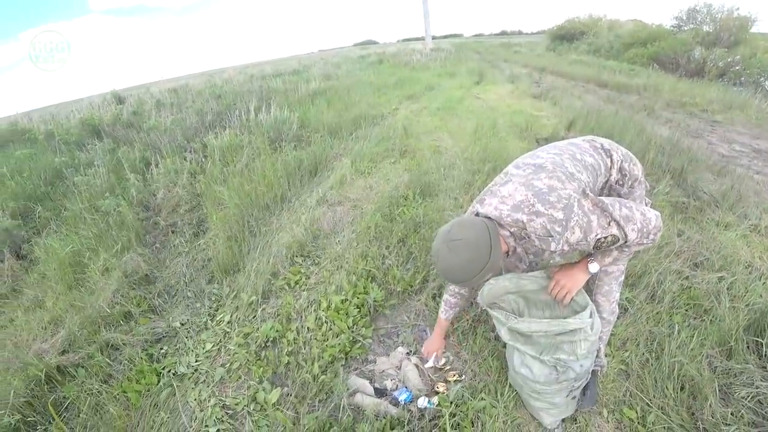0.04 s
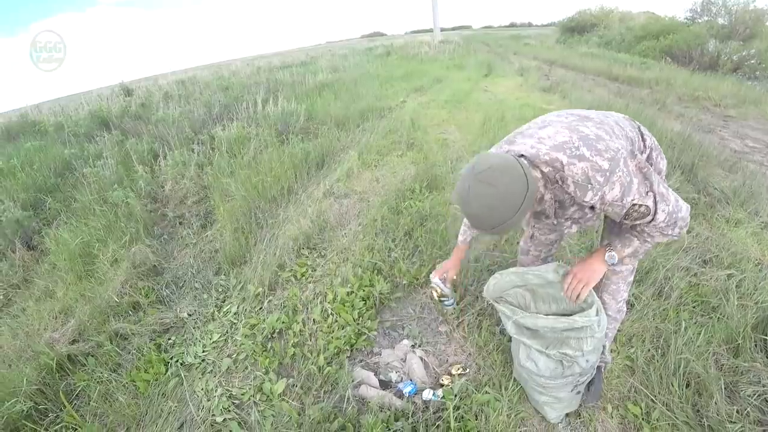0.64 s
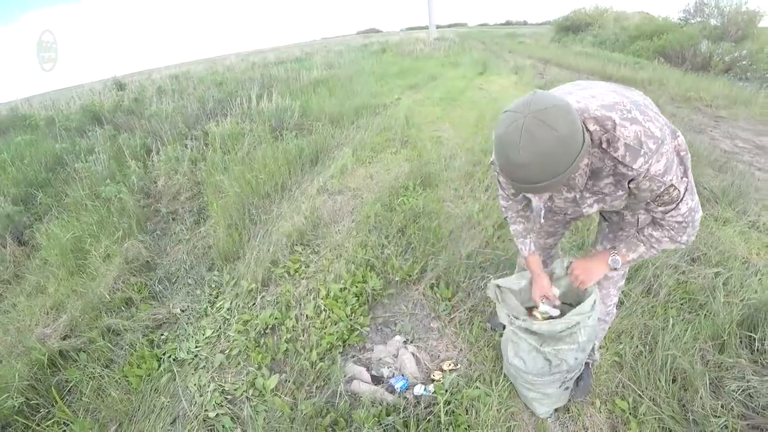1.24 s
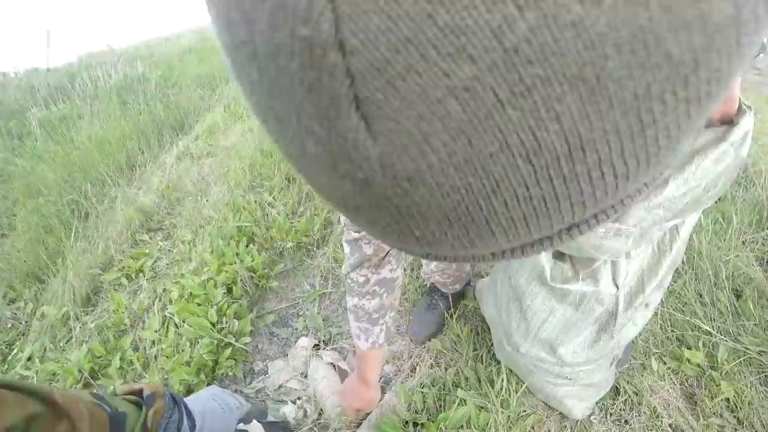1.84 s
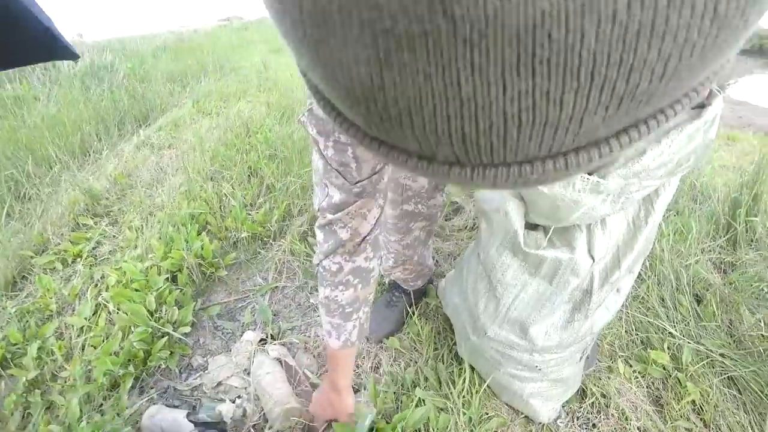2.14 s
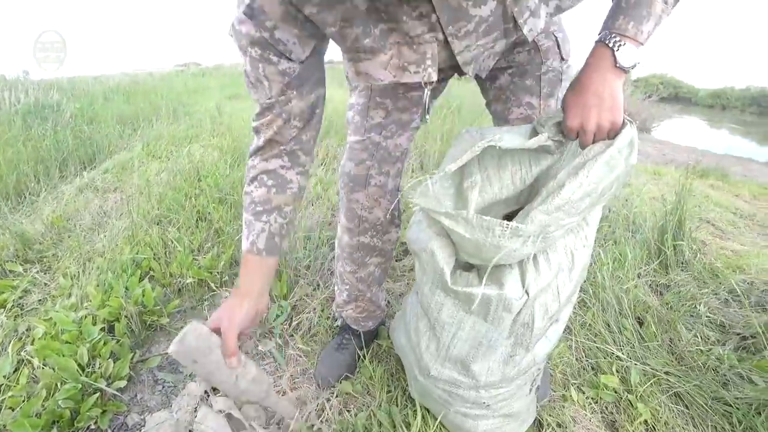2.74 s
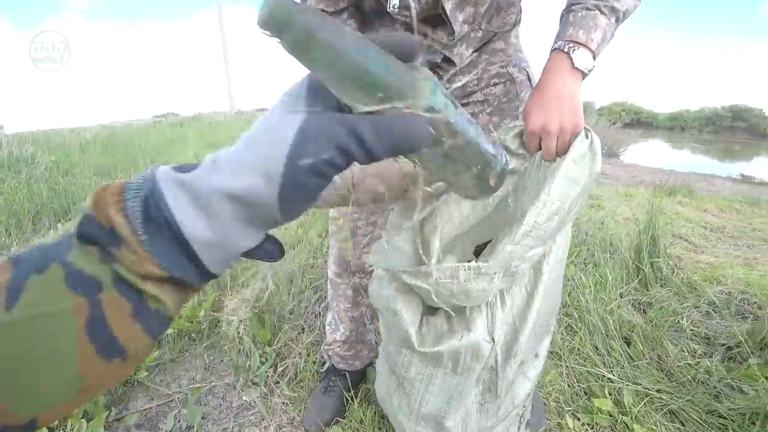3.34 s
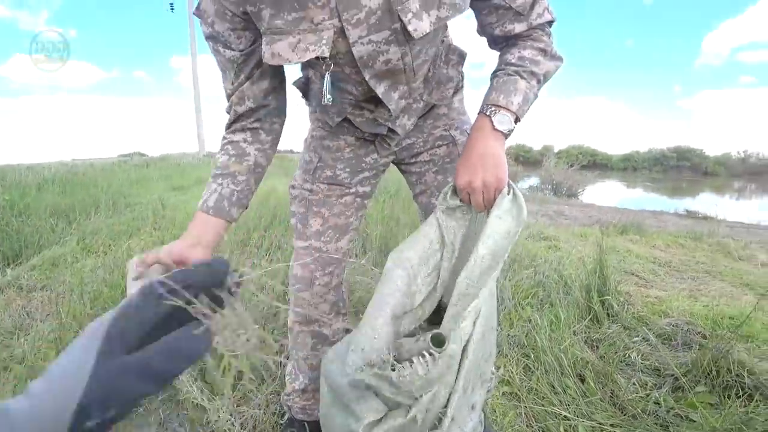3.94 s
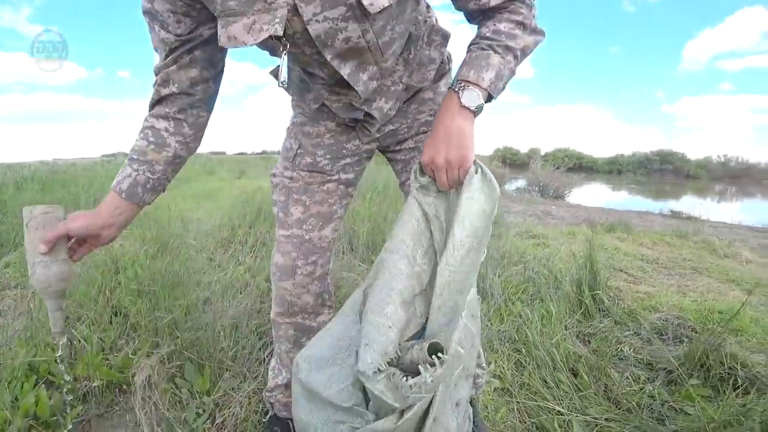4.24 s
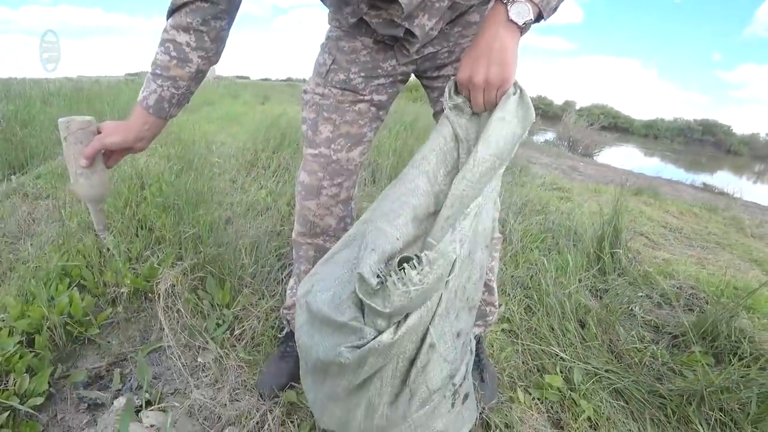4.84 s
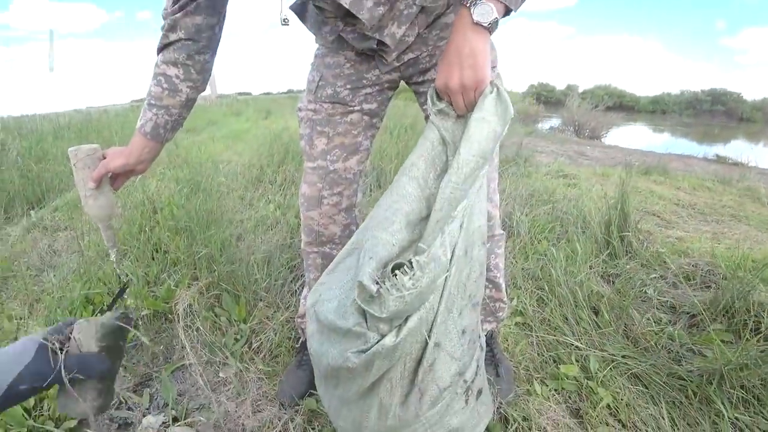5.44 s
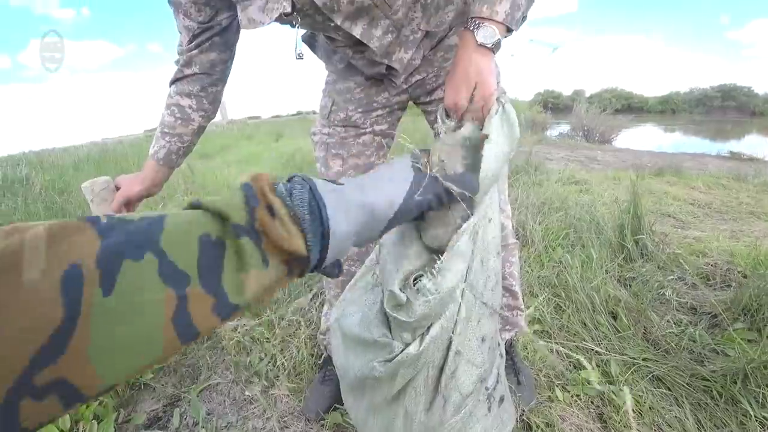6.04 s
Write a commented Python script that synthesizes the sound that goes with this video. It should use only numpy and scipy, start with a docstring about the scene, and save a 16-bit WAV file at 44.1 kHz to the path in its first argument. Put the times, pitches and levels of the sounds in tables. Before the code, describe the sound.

Litter is gathered into a crinkling sack: hollow can knocks, one loud bottle clink, glass chatter and small dry snaps.

```python
"""Cans knock and glass bottles clink into a rustling woven plastic sack on a grassy river bank.
The cans crack and ring briefly; the glass rings in its modes, grinds, and hums softly at the neck.
The sack's walls rub, its tapes tick, its creases pop, and dry stems snap.
Light wind puffs on the microphone, and a limiter squashes the hardest clink."""
import sys
import numpy as np
from scipy import signal
from scipy.fft import rfft, irfft, next_fast_len
from scipy.io import wavfile
from scipy.ndimage import uniform_filter1d

SR = 44100
rng = np.random.default_rng(int(sys.argv[2]) if len(sys.argv) > 2 else 0)


def materialize(psi):
    """Save the field psi as 16-bit PCM at rate SR to the path in sys.argv[1].

    A 1-D psi becomes a single channel; in a 2-D psi each row is a channel.
    """
    bounded = np.clip(np.atleast_2d(psi).T, -1, 1)
    quanta = np.round(bounded * 32767).astype(np.int16)
    wavfile.write(sys.argv[1], SR, quanta)


N = 272979
TIME = np.arange(N) / SR

# the ringing modes of each piece of glass, by name: (pitch [Hz], level [dB], t60 [s])
GLASS_MODES = { "green": [(1331, -2, .14), (1873, -30, .25), (2665, -8, .045), (3068, -18, .06),
               (3395, -2, .1), (3562, 0, .11), (3709, -20, .08), (6977, -30, .1)],
               "brown": [(1131, -3, .07), (2866, 0, .1), (4384, -4, .12), (4464, -5, .1), (5514, -10, .12),
               (5929, -8, .15), (5979, -2, .24), (6127, -7, .16), (7327, -13, .08), (8210, -11, .08),
               (10800, -10, .1), (12600, -10, .07)], "flask": [(2343, 6.5, 0.08), (2980, -24, 0.15),
               (4780, 8.5, .1), (6080, 6.5, 0.19), (6570, 3, 0.069), (7800, -12, .1), (8300, 4, 0.2),
               (10750, 16.5, 0.053)], "heap": [(2945, 0, .12), (4384, -3, .12), (4992, 0, .12),
               (5670, -4, .1), (6000, -2, .12), (7150, -5, .1), (7870, -6, .1), (9220, -7, .08),
               (11100, -3, .1)], "neck": [(4620, -2, .06), (7666, -10, .07), (10087, 0, .07),
               (10260, -11, .07), (10445, -8, .08), (11800, -14, .07)], "muddy": [(2870, -5, 0.075),
               (3360, 5, 0.012)], "shard": [(2600, 0, .045), (4100, -10, .04)],
               "mossy": [(2290, 10.5, 0.051), (3395, 11, 0.14), (5830, 4, 0.012), (11200, 7, 0.033)]}


def from_db(db):
    return 10 ** (np.asarray(db) / 20)


def rms_one(x):
    return x / np.sqrt(np.mean(x ** 2) + 1e-20)


def loudest_one(x, size=176):
    """Scales the loudest 4 ms to rms 1."""
    return x / np.sqrt(uniform_filter1d(np.mean(x ** 2, axis=0), size).max())


def at_hz(curve, hz):
    """Reads a curve along a log frequency axis."""
    curve_hz, values = np.transpose(curve)
    return np.interp(np.log(hz), np.log(curve_hz), values)


def band(x, low_hz, high_hz, order=2):
    sos = signal.butter(order, [low_hz, min(high_hz, .47 * SR)], "band", fs=SR, output="sos")
    return signal.sosfilt(sos, x + 1e-18)


def resonate(x, hz, width_hz):
    return band(x, hz - width_hz / 2, hz + width_hz / 2, order=1)


def radiated(x, low_hz):
    """Small bodies cannot push out bass."""
    return signal.sosfilt(signal.butter(2, low_hz, "high", fs=SR, output="sos"), x + 1e-18)


def add(out, s, sound, pan_db=0):
    """Places a sound in time and between the ears; positive pan is left."""
    start = round(s * SR)
    panned = sound * from_db([[pan_db / 2], [-pan_db / 2]])
    out[:, start:start + sound.shape[-1]] += panned[:, :N - start]


def colour(noise, spectrum, likeness=None):
    """Gives two rows of noise a spectrum and mixes them as mid and side; rms 1."""
    # the default stereo image: (frequency [Hz], left-right likeness [0-1])
    usual_likeness = [(60, 0.23), (250, 0.72), (1000, 0.15), (4000, 0.84), (9000, 0.88), (15000, 1)]
    size = next_fast_len(N)
    hz = np.maximum(np.fft.rfftfreq(size, 1 / SR), 1)
    mid, side = rfft(noise, size) * from_db(at_hz(spectrum, hz))
    alike = np.clip(at_hz(likeness or usual_likeness, hz), 0, 1)
    stereo = np.sqrt(1 + alike) * mid + np.sqrt(1 - alike) * side * [[1], [-1]]
    return rms_one(irfft(stereo, size)[:, :N])


def drift(per_s):
    """A random wander between knots of spread 1."""
    knots = rng.standard_normal(N // 20)
    return np.interp(TIME * per_s, np.arange(len(knots)), knots)


def grainy(per_s, size_db, grain_s, smooth):
    """Two rows of noise made of tiny bursts of uneven size over a smooth share."""
    sizes = (rng.random(N) < per_s / SR) * from_db(size_db * np.minimum(rng.exponential(1, N), 4))
    power = signal.lfilter([1], [1, -np.exp(-1 / (grain_s * SR))], sizes ** 2 + 1e-18)
    return np.sqrt(power / power.mean() + smooth) * rng.standard_normal((2, N))


def fading(t60, rise_s=0.00011, size=8000):
    """A burst of noise that swells at once and dies, nearly alike in both channels."""
    t = TIME[:size]
    mid, side = rng.standard_normal((2, size))
    return (mid + 0.26 * side * [[1], [-1]]) * from_db(-60 * t / t60) * (1 - np.exp(-t / rise_s))


def crack(hz, t60, tail_db=-26, tail_t60=0.067):
    """A short broad crack around one pitch; peak 1."""
    burst = fading(t60, rise_s=0.00008) + from_db(tail_db) * fading(tail_t60)
    sound = band(band(burst, hz * 0.53, hz * 1.35, order=1), 340, hz * 2.4)
    return sound / np.abs(sound).max()


def pings(per_s, low_hz, high_hz, width_hz, count=14):
    """Many small touches, each ringing one of many unrelated pieces; rms 1."""
    touches = (rng.random(N) < per_s / SR) * rng.standard_normal(N)
    piece = rng.integers(0, count, N)
    pitches = np.geomspace(low_hz, high_hz, count) * (1 + rng.uniform(-0.86, 1, count) / count)
    return rms_one(sum(resonate(touches * (piece == k), hz, width_hz) for k, hz in enumerate(pitches)))


def wind(air_db=-72, puff_half_s=0.019):
    """Short low puffs on the microphone over the faint hush of open grassland."""
    # puffs of wind and soft bumps: (time of the crest [s], level [dB])
    puffs = [(0.501, -45), (0.565, -52.5), (0.629, -52.5), (0.812, -55), (0.96, -54.5), (1.385, -57),
             (2.584, -44.5), (2.666, -48), (4.24, -46), (4.283, -35.5), (5.04, -49), (6.026, -51.5)]
    # the tone of the open air: (frequency [Hz], relative level [dB])
    air_spectrum = [(30, 6), (100, 15.5), (250, 10.5), (600, 13), (1500, 4.5), (4000, -6.5), (9000, -54),
                    (16000, -19)]
    gusts = sum(from_db(db) * np.exp(-((TIME - s) / puff_half_s) ** 2) for s, db in puffs)
    eddies = rng.standard_normal(N) + 1.64 * rng.standard_normal((2, N))
    rumble = rms_one(band(band(eddies, 125, 330, order=1), 50, 650))
    hush = colour(rng.standard_normal((2, N)), air_spectrum)
    return gusts * rumble + from_db(air_db) * hush


def sack(rub_db=-3, weave_db=3, crease_db=-17, settle_db=-2, settle_from_s=3.9, settle_to_s=4.87):
    """One movement drives it all: walls rub dully, the load settles, plastic tapes tick, creases pop."""
    # how hard the sack is moved: (time [s], level [dB])
    handling = [(0.0, -56), (0.34, -53.5), (0.65, -67), (1.2, -53.5), (1.43, -31), (1.63, -48.5),
                (2.01, -54), (2.16, -44.5), (2.87, -42), (2.94, -49), (3.55, -48.5), (3.66, -36.5),
                (3.88, -38), (4.46, -47.5), (4.58, -42), (5.03, -45), (5.09, -52.5), (5.73, -61),
                (6.07, -55), (6.18, -39.5)]
    # the dull rub of the walls: (frequency [Hz], relative level [dB])
    rub_spectrum = [(40, -42), (120, -29.5), (300, -9), (600, -4.5), (1050, 1.5), (1700, -4), (2600, -3.5),
                    (5000, -79), (16000, -75)]
    # the bright ticking of the weave: (frequency [Hz], relative level [dB])
    weave_spectrum = [(500, -51), (1500, -11.5), (3000, 0.5), (4500, 3), (6500, 2.5), (8500, -2.5),
                      (11500, 0.5), (13500, -10.5), (16000, -4.5)]
    rubbing = colour(grainy(per_s=320, size_db=3, grain_s=0.0024, smooth=0.7), rub_spectrum)
    settling = (TIME > settle_from_s) & (TIME < settle_to_s)
    rubbing += settling * from_db(settle_db) * pings(per_s=97, low_hz=703, high_hz=1770, width_hz=66)
    ticking = colour(grainy(per_s=1100, size_db=6, grain_s=0.00065, smooth=1.73), weave_spectrum)
    pops = grainy(per_s=52, size_db=1.5, grain_s=0.00052, smooth=0)
    creases = colour(pops, spectrum=[(900, -12), (4000, -9), (12000, -16)])
    effort_db = np.interp(TIME, *np.transpose(handling))
    mean_db = effort_db.mean()
    swing_db = effort_db - mean_db
    rub_flutter_db, weave_flutter_db = 2 * drift(per_s=35), 1.86 * drift(per_s=40)
    # creases follow the movement least: a slack sack pops on after its rubbing has nearly stopped
    return (rubbing * from_db(mean_db + 0.85 * swing_db + rub_db + rub_flutter_db)
            + ticking * from_db(effort_db + weave_db + weave_flutter_db)
            + creases * from_db(mean_db + 0.4 * swing_db + crease_db))


def snaps(base_t60=0.036, base_hz=7000, doubling_db=11.5):
    """A stem or crease gives way; a strong, bright snap is a run of tearing fibres and lasts longer."""
    # dry stems and stiff creases snapping: (time [s], level [dB], centre [Hz])
    breaks = [(0.761, -31, 4570), (1.918, -23.5, 4440), (2.168, -4.5, 2770), (2.517, -16, 8300),
              (2.58, -11.5, 9150), (2.771, -18.5, 6660), (2.857, -16, 7300), (3.963, -15, 7750),
              (4.885, -12.5, 8300), (4.925, -10, 5830), (4.992, -11.5, 6500), (5.032, -19.5, 5930),
              (5.043, -17, 5900), (5.079, -24.5, 7000), (5.304, -28.5, 9000), (5.409, -29, 9100),
              (5.493, -22, 6000), (5.532, -24, 8900), (5.543, -23, 9000), (5.635, -26.5, 7800),
              (5.659, -25.5, 10900), (5.778, -24.5, 7000), (5.811, -22.5, 10200), (5.932, -24, 10000),
              (5.974, -27.5, 6650)]
    out = np.zeros((2, N))
    for s, db, hz in breaks:
        t60 = base_t60 * 2 ** (db / doubling_db) * hz / base_hz
        add(out, s, from_db(db) * crack(hz, t60), pan_db=rng.normal(0, 1))
    return out


def bottle_necks(swell_s=0.016):
    """The air in a jolted bottle swells into a soft hollow note."""
    # air sounding in a neck: (time [s], pitch [Hz], level [dB], t60 [s])
    notes = [(3.455, 244, -39, 0.5), (3.60, 265, -53, 0.75), (3.715, 272, -33, 0.56), (4.17, 274.7, -57, 1),
             (5.352, 525, -30, 0.054), (6.023, 276, -29, 0.1)]
    out, t = np.zeros((2, N)), TIME[:30000]
    for s, hz, db, t60 in notes:
        envelope = from_db(db - 60 * t / t60) * (1 - np.exp(-t / swell_s))
        add(out, s, envelope * np.sin(2 * np.pi * hz * t))
    return out


def slides(slip_db=0.5, ring_db=-5, tinkle_db=-1.5, attack_s=0.005, release_t60=0.13):
    """Dense slips under each slide ring in the heap of glass and set its neighbours tinkling."""
    # litter sliding and chattering over itself: (time [s], hold [s], level [dB])
    moves = [(1.254, 0.1, -40), (1.377, 0.078, -32.5), (1.505, 0.03, -34), (3.684, 0.04, -32.5),
             (3.752, 0.026, -22), (4.178, 0.016, -31), (4.795, 0.012, -35)]
    # the grind of glass on glass: (frequency [Hz], relative level [dB])
    grind_spectrum = [(40, -55), (150, -26.5), (450, -18), (950, 8.5), (1400, 8), (1900, 2), (2900, 4),
                      (3600, -1.5), (5800, -8), (8500, -2), (12500, -57), (16000, -32)]
    pressure = np.zeros(N)
    for s, hold_s, db in moves:
        grip = np.clip((TIME - s) / attack_s, 0, 1)
        pressure += grip * from_db(db - 60 * np.maximum(TIME - s - hold_s, 0) / release_t60)
    grit = grainy(per_s=720, size_db=3, grain_s=0.0014, smooth=0.062)
    slips = pressure * colour(grit, grind_spectrum, likeness=[(1000, 0.92)])
    rings = sum(from_db(db) * resonate(slips, hz, width_hz=36) for hz, db, _ in GLASS_MODES["heap"])
    rings = slips.std() * rms_one(rings)
    tinkle = pressure * pings(per_s=330, low_hz=2550, high_hz=14050, width_hz=30)
    sound = from_db(slip_db) * slips + from_db(ring_db) * rings + from_db(tinkle_db) * tinkle
    return sound * from_db([[-1], [1]])  # a little to the right


def knocks(thud_t60=0.037, ring_t60=0.049, top_t60=0.027, rebound_s=0.017, rebound_loss_db=15.5):
    """A dented wall cracks, treble dying first, rings briefly and falls back once, more softly."""
    # hollow knocks of cans and bottles: (time [s], level [dB], ring [Hz], hardness [dB])
    hits = [(0.053, -27, 1423, -2), (0.064, -33.5, 1470, -4.5), (0.073, -30.5, 1400, -1),
            (0.120, -23.5, 880, -1), (0.323, -35, 1546, -1.5), (0.371, -36, 2170, 0),
            (1.259, -35, 1500, 11), (1.299, -41, 2430, 17.5), (1.3816, -18.5, 1350, 2),
            (1.422, -21, 1380, 4.5), (1.449, -28, 2420, 7.5), (1.553, -26.5, 1097, 4.5),
            (2.7135, -35.5, 1115, -1.5), (3.166, -36.5, 1036, -6.5), (3.19, -34.5, 1040, 2),
            (3.380, -33.5, 2400, -5), (3.602, -32.5, 1194, -2.5), (3.687, -26, 1035, 1),
            (3.7114, -21.5, 1086, -2.5), (3.729, -24, 962, -4.5), (3.749, -21, 943, 3.5),
            (3.782, -20.5, 2530, 7), (3.819, -24.5, 978, 0), (4.154, -28, 1172, -2.5),
            (4.169, -24.5, 1370, -1.5), (4.194, -31.5, 1054, -9), (4.21, -27.5, 806, -7),
            (4.299, -34.5, 1140, -3), (4.384, -35.5, 943, 0.5), (4.517, -37, 723, -8.5),
            (5.009, -29, 1047, 4), (6.037, -47, 990, -10.5)]

    def burst(t60):
        """The impact, with a faint shiver of what lies around."""
        return fading(t60) + from_db(-24) * fading(t60=0.1)

    out, t = np.zeros((2, N)), TIME[:8000]
    for s, db, hz, hardness_db in hits:
        ring = np.sin(2 * np.pi * hz * t) * from_db(-60 * t / ring_t60) * np.ones((2, 1))
        for delay_s, loss_db in ((0, 0), (rebound_s * rng.uniform(.8, 1.2), rebound_loss_db)):
            thud = band(burst(thud_t60), 704, 1570)
            clack = band(burst(thud_t60 * 0.84), 2100, 3820)
            top = band(band(burst(top_t60), 4400, 14400), 2950, 6070, order=1)
            # a hard contact trades thud and ring for treble
            sound = (from_db(-2 - hardness_db) * loudest_one(thud)
                     + from_db(-3 - hardness_db) * loudest_one(ring)
                     + from_db(-1) * loudest_one(clack)
                     + from_db(hardness_db) * loudest_one(top))
            add(out, s + delay_s, from_db(db - loss_db) * sound, pan_db=-1.5)
    return radiated(out, low_hz=233)


def clinks(db_per_octave=9.5, chance_db=2, spread_rad=0.36, crack_db=-4, crack_t60=0.023):
    """Each contact cracks and rings the modes of one piece, lifting those near the pitch it favours."""
    # glass meets glass: (time [s], level [dB], favoured pitch [Hz], piece)
    contacts = [(1.260, -33, 8250, "flask"), (1.275, -33, 5100, "flask"), (1.327, -29.5, 2440, "flask"),
                (1.404, -16.5, 3300, "heap"), (1.417, -24, 4900, "heap"), (1.445, -22.5, 4460, "brown"),
                (1.482, -22, 6140, "heap"), (1.551, -23.5, 7260, "heap"), (2.448, -25, 3520, "muddy"),
                (2.457, -21.5, 2720, "muddy"), (2.577, -34, 6100, "mossy"), (3.454, 6.5, 2850, "green"),
                (3.712, -11, 3530, "brown"), (3.732, -13.5, 6040, "brown"), (3.758, -23.5, 4600, "brown"),
                (3.794, -20, 7300, "brown"), (3.806, -14.5, 10200, "neck"), (3.889, -21.5, 2240, "brown"),
                (3.91, -21.5, 4600, "neck"), (4.088, -24, 2170, "brown"), (4.886, -22, 2540, "shard"),
                (5.439, -43.5, 2840, "mossy")]
    out, t = np.zeros((2, N)), TIME[:14000]
    for s, db, favoured_hz, piece in contacts:
        hz, mode_db, t60 = np.array(GLASS_MODES[piece]).T[:, :, None]
        strength, polarity, skew = rng.standard_normal((3, len(hz), 1))
        octaves_away = np.minimum(np.abs(np.log2(hz / favoured_hz)), 1.5)
        struck_db = db + mode_db - db_per_octave * octaves_away + chance_db * strength
        decays = np.sign(polarity) * from_db(struck_db - 60 * t / t60)
        # each mode radiates its own way, so it meets the two microphone ports at different phases
        modes = [decays * np.sin(2 * np.pi * hz * t + side * spread_rad * skew) for side in (-1, 1)]
        add(out, s, np.sum(modes, axis=1), pan_db=-2)
        add(out, s, from_db(db + crack_db) * crack(favoured_hz, crack_t60))
    return radiated(out, low_hz=530)


def microphone_ports(x):
    """Sound bends round the housing and reaches the left port a little later."""
    # phase between the two ports: (frequency [Hz], lead of the left [rad])
    port_phase = [(100, -0.43), (500, -0.77), (1900, -0.89), (3300, -0.84), (6000, 0.04), (16000, -1.1)]
    size = next_fast_len(N + 2000)
    lead = at_hz(port_phase, np.maximum(np.fft.rfftfreq(size, 1 / SR), 1))
    return irfft(rfft(x, size) * np.exp(.5j * lead * [[1], [-1]]), size)[:, :N]


def scene():
    """Litter, stems and sack reach the microphone over a light wind."""
    gathering = knocks() + snaps() + clinks() + bottle_necks() + slides() + sack()
    return microphone_ports(gathering) + wind()


def record(dry, limit_db=-12, release_db_per_s=520, window=220, cutoff_hz=16000):
    """A fast look-ahead limiter holds loud rings level; peaks are rounded and the top is cut."""
    power = np.maximum(uniform_filter1d(np.mean(dry ** 2, axis=0), window), 1e-12)
    over_db = np.maximum(10 * np.log10(power) - limit_db, 0)
    release_db = release_db_per_s * TIME
    reduction_db = np.maximum.accumulate(over_db + release_db) - release_db
    limited = dry * from_db(-uniform_filter1d(reduction_db, window // 4))
    low_pass = signal.ellip(12, .1, 80, cutoff_hz, fs=SR, output="sos")
    return signal.sosfilt(low_pass, np.tanh(limited))


dry = scene()
out = record(dry)
materialize(out)
```